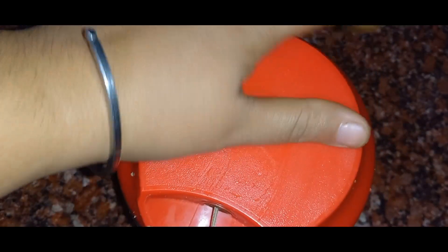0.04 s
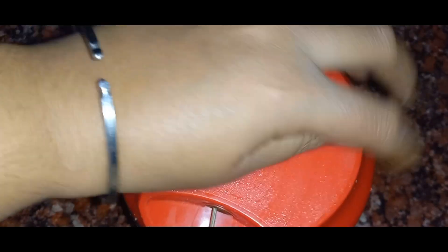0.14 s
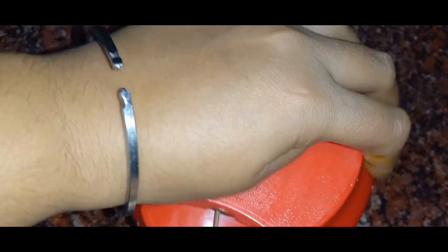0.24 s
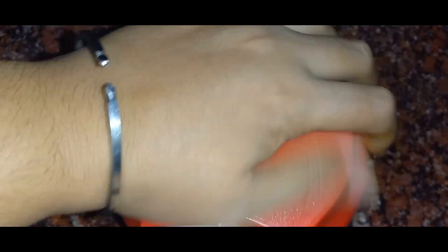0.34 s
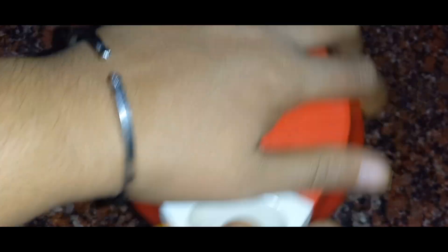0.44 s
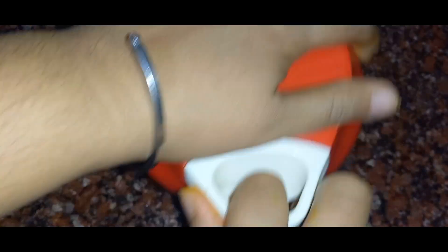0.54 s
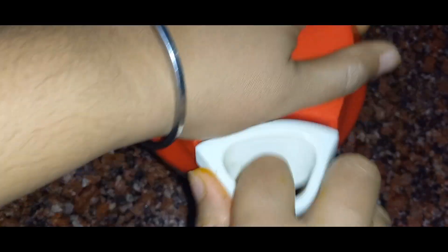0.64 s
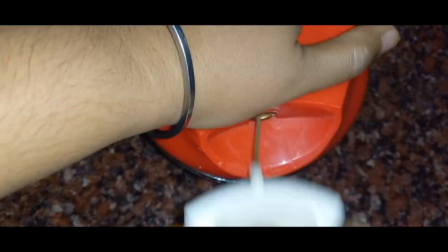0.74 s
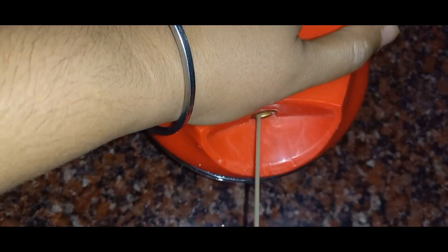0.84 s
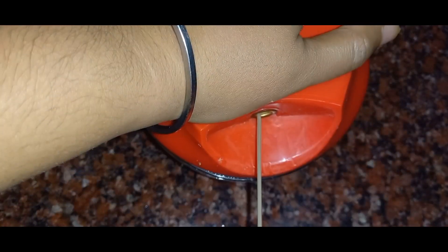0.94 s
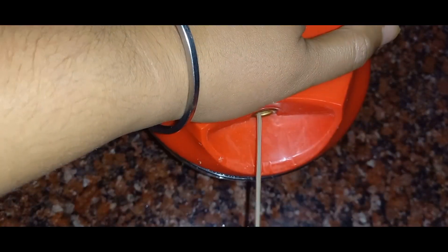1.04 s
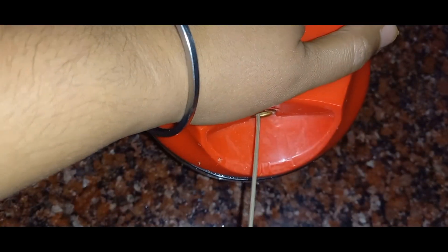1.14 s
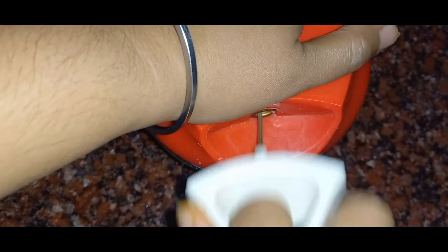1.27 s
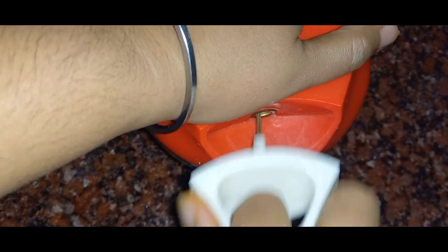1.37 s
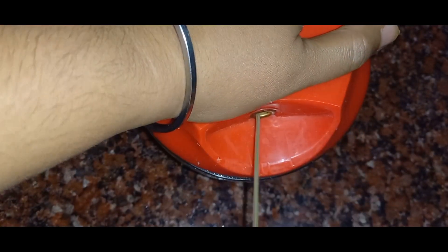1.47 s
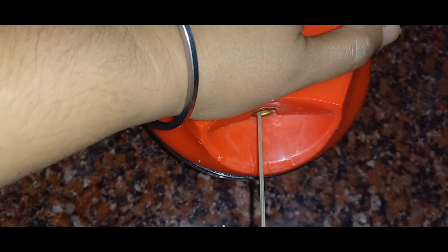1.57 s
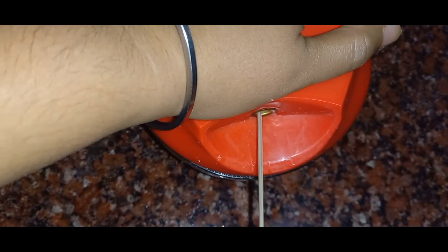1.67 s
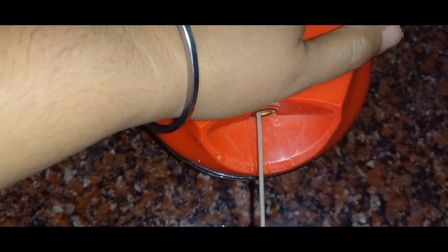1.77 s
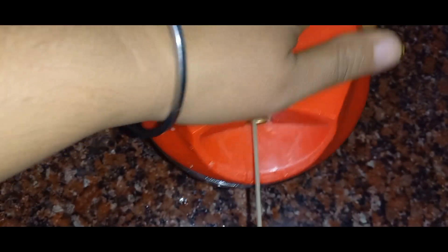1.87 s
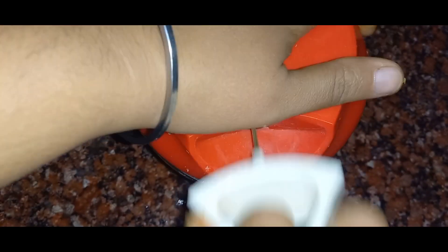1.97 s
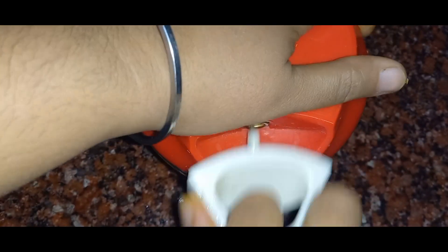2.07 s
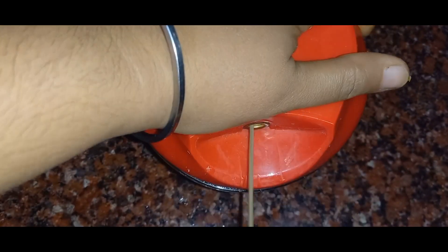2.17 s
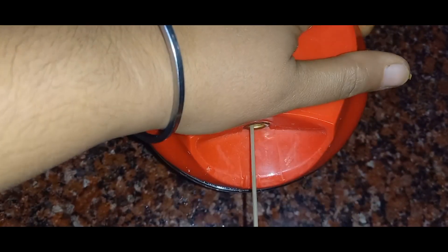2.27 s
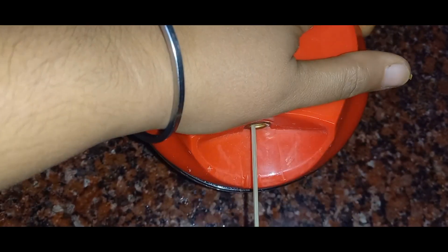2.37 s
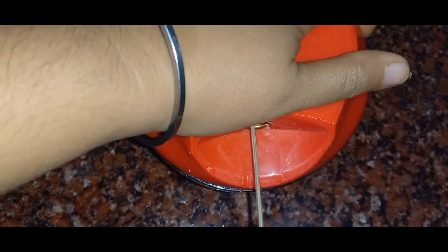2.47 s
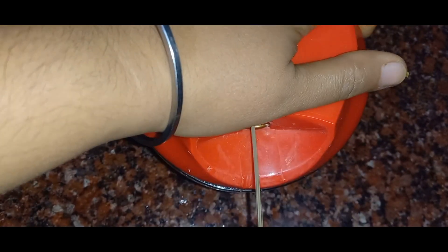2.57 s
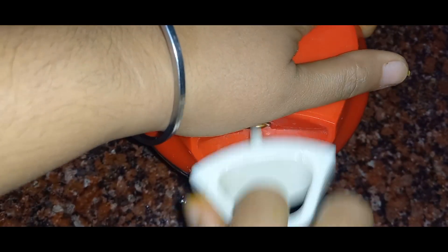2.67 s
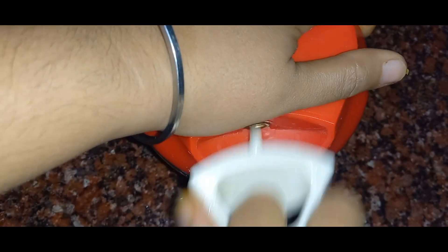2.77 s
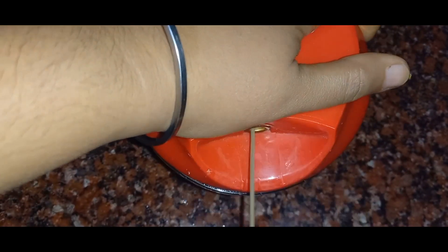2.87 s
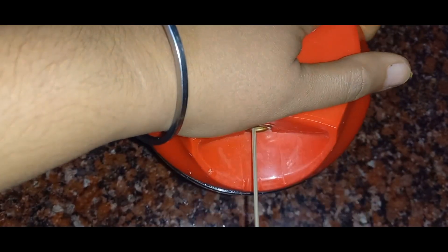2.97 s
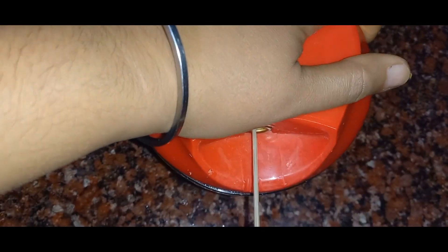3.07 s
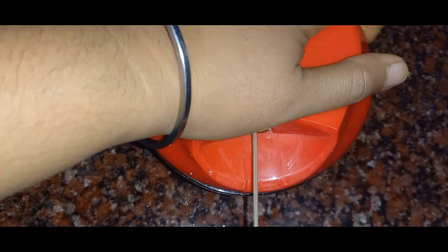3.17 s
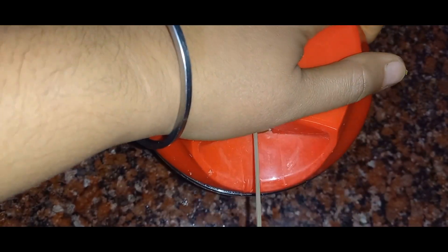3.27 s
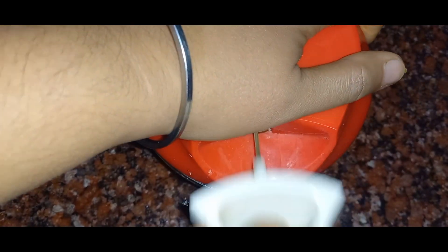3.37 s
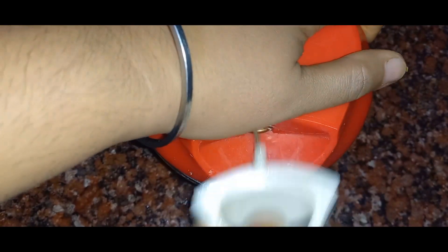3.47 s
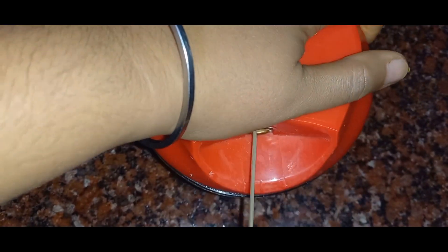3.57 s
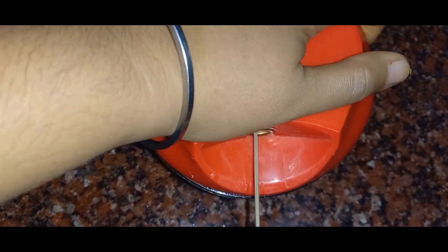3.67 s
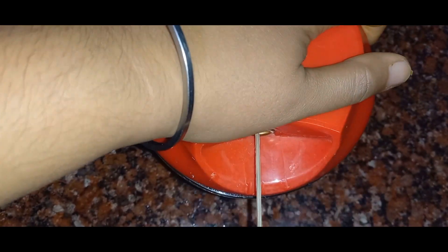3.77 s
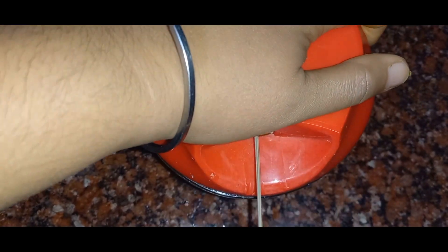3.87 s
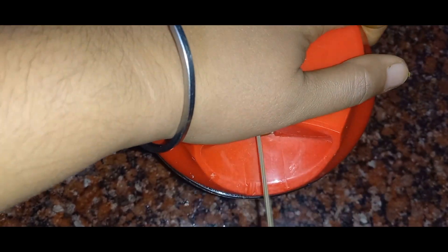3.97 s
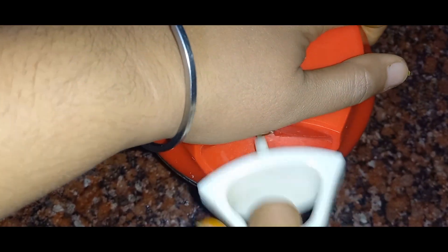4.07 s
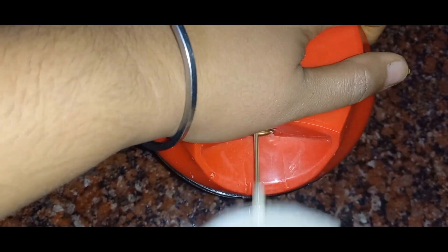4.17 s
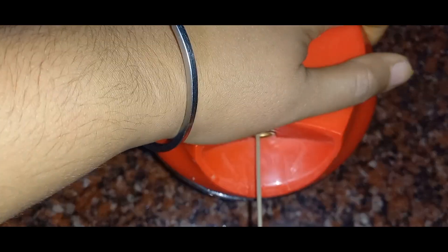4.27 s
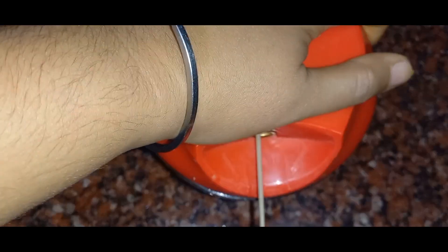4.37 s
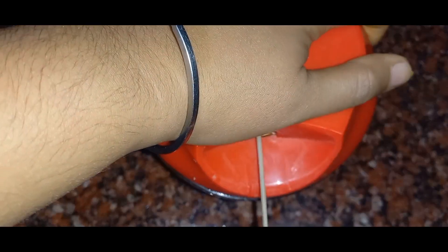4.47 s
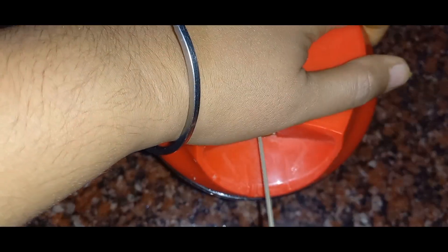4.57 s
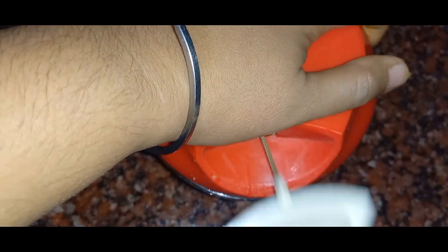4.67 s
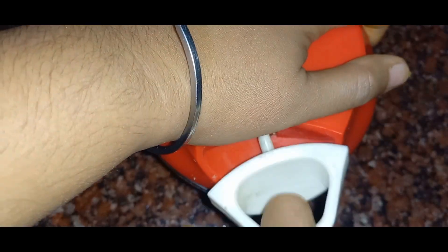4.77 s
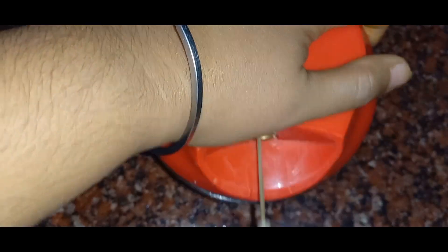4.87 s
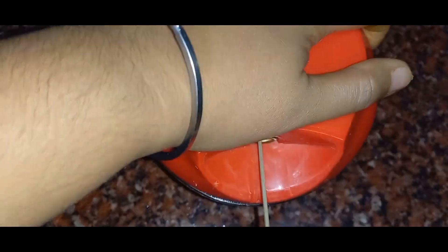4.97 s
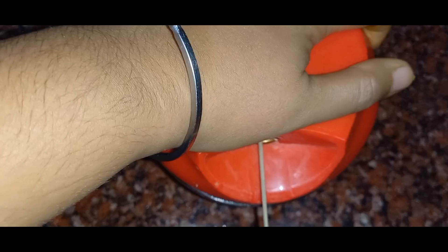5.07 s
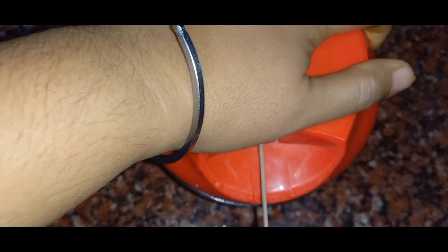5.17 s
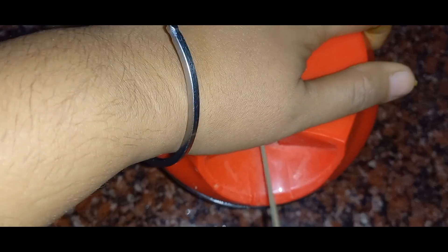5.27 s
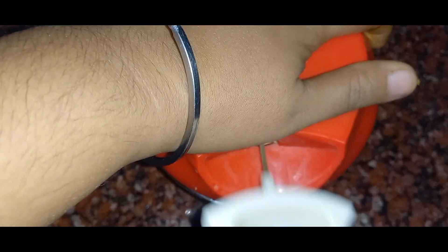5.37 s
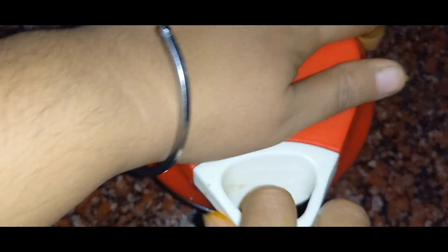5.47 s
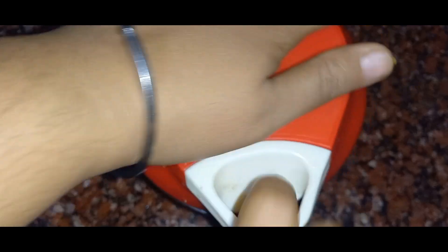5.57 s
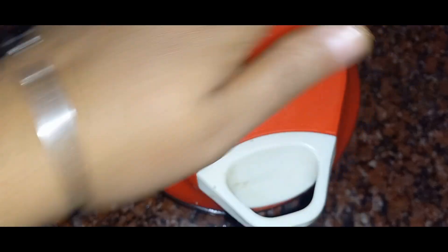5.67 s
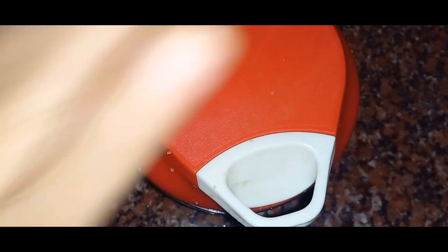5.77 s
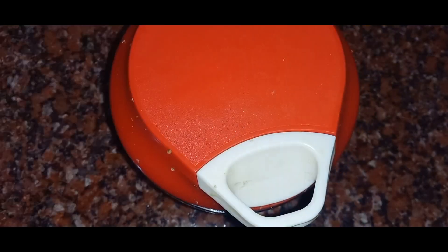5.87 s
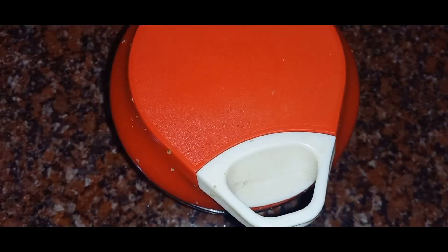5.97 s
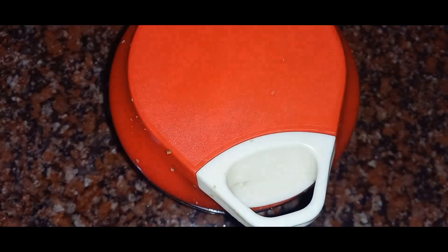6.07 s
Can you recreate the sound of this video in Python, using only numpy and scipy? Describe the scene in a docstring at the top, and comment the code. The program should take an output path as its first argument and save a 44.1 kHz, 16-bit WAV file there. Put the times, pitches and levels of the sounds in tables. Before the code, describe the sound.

Close plastic chopper on a stone counter: repeated gritty whirs, springy rasping cord returns, handle clacks, then a soft closing thud.

```python
"""A small hard kitchen: a hand-pulled food chopper works on a stone counter, close to a phone's two microphones.
Each pull spins blades that grind and knock the plastic bowl; a spring drags the cord back with a bright rasp.
Handle, hand and bowl clack and thump, brief rubs scrape the plastic, the bowl thuds on the stone near the end and
soft noise dies away after the last knocks; a low hum lies beneath. Friction and impact noise excite resonant modes
of lid, bowl, spring and slab; decaying noise makes the room."""
import sys
import numpy as np
from scipy import signal
from scipy.fft import rfft, irfft
from scipy.io import wavfile
from scipy.ndimage import uniform_filter1d

SR = 44100
rng = np.random.default_rng(int(sys.argv[2]) if len(sys.argv) > 2 else 0)


def to_wav(sig):
    """Store sig (one row per channel, or 1-D mono) as 16-bit WAV at the path in sys.argv[1].

    Samples outside -1..1 are clipped; the rate is SR.
    """
    pcm = np.clip(np.atleast_2d(sig), -1, 1) * 32767
    pcm = np.round(pcm).astype(np.int16)
    wavfile.write(sys.argv[1], SR, pcm.T)  # frames by channels


def attenuation_scalar(level_db):
    """Turn a level in dB into a linear amplitude multiplier (20 dB per decade)."""
    decades = np.asarray(level_db, float) / 20
    return 10 ** decades


N = 270814
T = np.arange(N) / SR

# All source and mode levels are relative: the mixing gains below scale them.
# each return of the cord: bite_s (spring bites), fastest_s, home_s, rasp_db, treble_db (above the rasp)
REWINDS = [(1.171, 1.233, 1.364, -32, 2), (1.861, 1.935, 2.153, -29, -1.5), (2.554, 2.609, 2.77, -30, 0.5),
           (3.239, 3.299, 3.467, -30.5, 1), (3.923, 3.992, 4.18, -28.5, -1.5),
           (4.58, 4.656, 4.81, -28.5, -0.9), (5.241, 5.32, 5.535, -34.5, -1.1)]
# modes of lid and handle: mode_hz, level_db, t60_s
LID_MODES = [(840, -14.5, 0.01), (1320, 0, 0.016), (1410, 3, .04), (1610, 3.5, 0.063), (1887, 6.5, 0.066),
             (2100, 5, 0.028), (2487, -1, 0.036), (2790, 0, 0.012), (3430, -0.5, 0.026), (4010, 4, 0.0061),
             (4860, 1.5, 0.0045)]


def unit(x):
    """Power normalization: scale to rms 1."""
    return x / np.sqrt(np.mean(x ** 2) + 1e-18)


def colour(x, points):
    """Minimum-phase filtering: the folded cepstrum of a (Hz, dB) gain curve gives a causal, unit-energy response."""
    hz, db = np.transpose(points)
    bin_hz = np.arange(1025) * SR / 2048
    log_gain = np.interp(np.log(bin_hz + 1), np.log(hz), db) * np.log(10) / 20
    cepstrum = irfft(log_gain)
    cepstrum[1:1024] *= 2
    cepstrum[1025:] = 0
    taps = irfft(np.exp(rfft(cepstrum)))
    return signal.oaconvolve(x, taps / np.sqrt(np.sum(taps ** 2)))[:N]


def walk(rate):
    """Slow random modulation: random levels, rate per second, joined by ramps and scaled to rms 1."""
    k = int(SR / rate)
    held = np.repeat(rng.standard_normal(N // k + 1), k)
    return unit(uniform_filter1d(held, k)[:N])


def ring(drive, modes, flicker_db, rate=70):
    """Modal superposition: separate noises, each flickering by itself, shake two-pole resonators at about unit power."""
    out = 0
    for hz, db, t60 in modes:
        r = np.exp(-np.log(1000) / (t60 * SR))
        shake = drive * rng.standard_normal(N) * attenuation_scalar(db + flicker_db * walk(rate))
        zeros = np.sqrt((1 - r * r) / 2) * np.array([1, 0, -1])
        poles = [1, -2 * r * np.cos(2 * np.pi * hz / SR), r * r]
        out = out + signal.lfilter(zeros, poles, shake)
    return out / np.sqrt(np.sum(attenuation_scalar(np.array(modes)[:, 1]) ** 2))


def grit(rate, spread_db, smooth, lumps_db, lump_rate, treble_rough):
    """Rough friction: random scraping impacts over a steady force, swelling in lumps; lid, bowl and treble."""
    hit = rng.random(N) < rate / SR
    size = np.minimum(rng.exponential(size=N), 3)
    # each impact decays with a time constant of 1.6 ms
    scrapes = signal.lfilter([1], [1, -np.exp(-1 / (0.0016 * SR))], hit * attenuation_scalar(spread_db * size))
    force = unit((unit(scrapes) + smooth) * attenuation_scalar(lumps_db * walk(lump_rate)))
    # an exponent below 1 evens out the force on the treble
    return np.array([force, force, unit(force ** treble_rough)])


def stroke(s, db, boom_db, treble_db):
    """Friction envelope: levels of lid, bowl and treble interpolated in dB, with a sharp onset and a gentle release."""
    attack_s, release_s = 0.002, 0.03  # before the first time, after the last
    fade = np.clip(np.minimum((T - s[0]) / attack_s, (s[-1] - T) / release_s) + 1, 0, 1)
    return fade * attenuation_scalar([np.interp(T, s, np.add(db, above)) for above in (0, boom_db, treble_db)])


def pulls():
    """Speed-dependent friction: blades speed up, grind and coast until the spring bites; slow blades sound boomier."""
    # each pull of the cord: grip_s, full_speed_s, let_go_s, full_speed_db, let_go_db
    pull_rows = [(0.791, 0.877, 1.072, -28, -29), (1.475, 1.568, 1.74, -28, -26.5),
                 (2.223, 2.293, 2.485, -24, -32), (2.914, 3.023, 3.132, -23, -28),
                 (3.578, 3.681, 3.803, -25, -24.5), (4.229, 4.372, 4.483, -25, -27.5),
                 (4.902, 5.006, 5.12, -30.5, -27)]
    grip_loss_db, coast_db_per_s = 14.5, 237
    # level above the grinding, and dB regained for each dB that slow blades lose
    boom_db, slow_boom = 0.55, 0.3
    treble_db, slow_treble = -12, 0.044
    out = 0
    for (grip, full, go, db, go_db), (bite, *_) in zip(pull_rows, REWINDS):
        stop = bite - 0.012
        lost_db = np.array([grip_loss_db, 0, 0, coast_db_per_s * (stop - go)])
        grind_db = [db, db, go_db, go_db] - lost_db
        out = out + stroke([grip, full, go, stop], grind_db,
                           boom_db + slow_boom * lost_db, treble_db + slow_treble * lost_db)
    return out


def rewinds():
    """Spring-driven friction: the spring bites, whips the cord in and slackens steadily until the handle is home."""
    bite_db, slack_db_per_s = -11, 90.5  # both relative to the fastest moment
    whip_s = 0.07  # the treble's third point lies this long after the fastest moment
    # above the rasp at bite, fastest, end of the whip and home
    boom_db, treble_shape_db = (3.5, 0, -2.5, -5), (3, -0.5, 2.5, -5.5)
    out = 0
    for bite, fastest, home, db, treble_db in REWINDS:
        slack_db = [bite_db, 0, -slack_db_per_s * whip_s, -slack_db_per_s * (home - fastest)]
        out = out + stroke([bite, fastest, fastest + whip_s, home], np.add(db, slack_db),
                           boom_db, np.add(treble_db, treble_shape_db))
    return out


def knocks():
    """Impact excitation: each knock drives the body with a decaying force and rings a note of wobbling level."""
    # clacks and thumps of handle, hand and bowl: start_s, level_db, boom_db, treble_db (above the level), note_hz
    clacks = [(0.351, -24, 2, -17, 1790), (0.372, -14, -20, -11.5, 1740), (0.392, -17.5, -9.5, -10.5, 1910),
              (0.407, -18.5, -9, -5, 2120), (0.456, -22, -13, -35, 1590), (0.471, -22, -17, -36, 1560),
              (0.762, -21, -16, -6, 1740), (0.778, -16, -5, -13.5, 1300), (1.434, -49.5, 17, -12, 1030),
              (1.474, -40, 2, 5, 1830), (1.486, -39, 16, -16, 1298), (1.51, -18, -18, -9, 1880),
              (2.124, -23.5, 5.5, -25, 1300), (2.159, -20, -16, -30, 2050), (2.181, -22, -1.5, -8.5, 1860),
              (2.782, -14, -8, -19, 1080), (2.798, -6.5, -15.5, -17, 2780), (2.875, -14.5, -13, -20, 1640),
              (2.887, -16.5, -10.5, -18.5, 1900), (3.517, -23, -5, -15.5, 1668),
              (3.536, -16, -13, -25, 2090), (3.565, -27, -6.5, -2.5, 1730), (4.195, -19.5, -11, -27, 1073),
              (4.209, -11.5, -19, -26, 2120), (4.238, -19, -3.5, -9, 1670), (4.258, -24, -1, -5, 1900),
              (4.826, -9.5, -16.5, -25, 2100), (4.837, -4.5, -17.5, -18.5, 2740),
              (4.901, -27, -10, -2, 1630), (4.917, -17.5, -2, -15, 1580), (5.536, -21.5, -7, -3.5, 2800),
              (5.545, -11.5, -14, -17.5, 1190), (5.571, -12.5, -23.5, -18.5, 1770),
              (5.735, -35.5, 9, -28, 1910), (6.06, -72.5, 17.5, -20, 999.8)]
    # blades fling hard lumps at the wall: start_s, level_db, treble_db (above the level), note_hz
    lumps = [(0.876, -15, -13, 1610), (1.027, -11, -28, 1614), (1.058, -20.5, -29.5, 1690),
             (1.097, -14.5, -24, 1957), (1.539, -19.5, -20, 2870), (1.707, -24, -26, 1800),
             (2.273, -12.5, -32, 1610), (2.436, -17.5, 0.5, 1640), (2.463, -19.5, -24, 2170),
             (3.063, -13, -25, 1940), (3.105, -16.5, -7, 1570), (3.154, -11.5, -32.5, 3430),
             (3.731, -12.5, -36, 1840), (3.853, -14.5, -17, 3630), (4.363, -13.5, -14, 4130),
             (4.424, -17.5, -20, 1700), (4.468, -14, -12.5, 1390), (5.061, -13.5, -8.5, 2430),
             (5.098, -18.5, -22.5, 1610), (5.146, -17, -23, 1570)]
    # returning cord snags on the spool: start_s, level_db, note_hz
    snags = [(1.191, -21, 1380), (1.241, -28, 1762), (1.918, -12, 1960), (2.588, -12, 1410),
             (2.628, -21.5, 1875), (3.3, -14, 1730), (3.342, -16.5, 2800), (4.641, -11, 1410),
             (5.245, -17, 1410)]
    # ratchet click as the spring bites: level_db, boom_db, treble_db (both above the level), note_hz
    catch = (-31.5, -13.5, -11, 1945)
    lump_boom_db, snag_boom_db, snag_treble_db = -12.5, -16, -13.5  # above the level
    rows = list(clacks)
    rows += [(s, db, lump_boom_db, treble_db, hz) for s, db, treble_db, hz in lumps]
    rows += [(s, db, snag_boom_db, snag_treble_db, hz) for s, db, hz in snags]
    rows += [(bite, *catch) for bite, *_ in REWINDS]
    drives, notes = np.zeros((3, N)), np.zeros(N)
    t = T[:SR // 20]
    for s, db, boom_db, treble_db, hz in rows:
        i = int(s * SR)
        # slower rings take more force for the same peak
        force = attenuation_scalar([[db - 8.5], [db + boom_db + 3.0], [db + treble_db - 4.0]])
        drives[:, i:i + len(t)] += force * np.exp(-t / 0.0031)
        # the note falls 78 dB in the decay time of the lid's modes near it
        fade = np.exp(-9.0 * t / np.interp(hz, *np.transpose(LID_MODES)[::2]))
        wobble = 1 + 0.46 * np.sin(0.49 * hz * t)
        notes[i:i + len(t)] += attenuation_scalar(db - 8.0) * np.sin(2 * np.pi * hz * t) * fade * wobble
    return drives, notes


def rubs():
    """Noise swells: brief rubs scrape the plastic, and after the last knocks a soft noise dies away."""
    # each swell of noise: start_s, loudest_s, end_s, rub_db, boom_db (bowl above the rub)
    rub_rows = [(-0.15, 0.098, 0.16, -59.5, 8), (0.12, 0.3, 0.49, -52, -10), (0.35, 0.436, 0.53, -44.5, 5),
                (0.706, 0.761, 0.84, -50.5, -1), (2.785, 2.82, 3.0, -35, 0.5),
                (5.58, 5.588, 5.71, -43, -2.5), (5.734, 5.76, 5.95, -60.5, 5.5)]
    light_db, treble_db = -20, -10  # start and end under the loudest; treble above the rub
    out = 0
    for *s, db, boom_db in rub_rows:
        out = out + stroke(s, [db + light_db, db, db + light_db], boom_db, treble_db)
    return out


def chopper(pull, rewind, rub, knock):
    """Shared resonators: all these sources sound through the same lid, bowl and spring, over broad coloured noise."""
    # air and walls of the bowl: mode_hz, level_db, t60_s
    bowl_modes = [(202.8, -5, 0.12), (228.7, -5.5, 0.087), (282, -7, .06), (327.3, 0.5, 0.041),
                  (344.3, 1, 0.089), (430, -13.5, 0.0068), (451, -7, 0.043), (582, -9.5, 0.022),
                  (642, -4.5, 0.057), (797.5, -12, 0.12)]
    # coil spring and spool: mode_hz, level_db, t60_s
    spring_modes = [(8470, 1.5, 0.019), (9000, -10.5, .008), (11120, 0.5, 0.011), (12000, 0, .012)]
    # broad colour of grinding and knocks: hz, density_db (per Hz, relative)
    grind_colour = [(410, -26.5), (700, -3), (900, 4.5), (970, 0.5), (1640, 3), (2730, -4), (3450, 2.5),
                    (6500, -24.5), (8450, -41), (14300, -120)]
    # broad colour of rasp and rubs: hz, density_db (per Hz, relative)
    rasp_colour = [(410, -26), (700, -2), (1170, -10), (1280, -6.5), (1520, -4.5), (1880, 6.5),
                   (2350, -5.5), (3420, -1.5), (6500, -16), (8450, -45), (14300, -120)]
    # broad colour of every source's treble: hz, density_db (per Hz, relative)
    treble_colour = [(3240, -16), (5500, -1), (6890, -3), (8430, 2), (11200, 0), (14800, -1.5),
                     (16000, -11), (16500, -72.5)]
    lid_drive = 0.42 * pull[0] + 0.31 * rewind[0] + 0.5 * rub[0] + 0.5 * knock[0]
    lid = ring(lid_drive, LID_MODES, 4.7)
    bowl = ring(pull[1] + rewind[1] + rub[1] + knock[1], bowl_modes, 2.26, rate=30)
    spring_drive = 0.26 * pull[2] + 0.61 * rewind[2] + 0.2 * rub[2] + 0.31 * knock[2]
    spring = ring(spring_drive, spring_modes, 2.1, rate=31)
    grind, rasp, hiss = rng.standard_normal((3, N))
    broad = colour(grind * (0.69 * pull[0] + 0.77 * knock[0]), grind_colour)
    broad += colour(rasp * (0.98 * rewind[0] + 0.81 * rub[0]), rasp_colour)
    broad += colour(hiss * (pull[2] + rewind[2] + rub[2] + knock[2]), treble_colour)
    # the small bowl sends out little below its first mode
    radiation = signal.butter(3, 160.0, "high", fs=SR, output="sos")
    return signal.sosfilt(radiation, lid + bowl + spring + broad)


def rattle(level, low_hz, high_hz, cycles, spread_db, count):
    """Random impacts: bits of food and gear teeth tick the walls, each a brief damped sine; mid and side."""
    when, pitch, size, pan = rng.random((count, 4)).T
    length = 600  # samples
    start = (when * (N - length)).astype(int)
    turns = (low_hz * (high_hz / low_hz) ** pitch)[:, None] * T[:length]
    strength = attenuation_scalar(-spread_db * np.log(size + 0.016))[:, None]
    ticks = np.sin(2 * np.pi * turns) * np.exp(-turns / cycles) * strength
    ticks /= np.sqrt(np.sum(ticks ** 2) / N)
    places = (start[:, None] + np.arange(length)).ravel()
    return [np.bincount(places, (ticks * (level[start] * weight)[:, None]).ravel(), N)
            for weight in (1, 3.3 * (pan - 0.5))]


def thud():
    """Impulse response: one soft push rings the bowl's base on the stone as damped sines."""
    # bowl meets stone: start_s, level_db, push_s (time constant of the onset)
    thud_push = (5.738, -22.5, 0.0021)
    # base of the bowl on the stone: mode_hz, level_db, t60_s
    thud_modes = [(196.6, 3, 0.22), (321, -4.5, 0.12), (455, -9, 0.044), (650.6, -4, 0.033), (107, -15, .3)]
    s, db, push_s = thud_push
    t = np.maximum(T - s, 0)[:, None]
    hz, mode_db, t60 = np.transpose(thud_modes)
    rings = attenuation_scalar(mode_db) * np.sin(2 * np.pi * hz * t) * np.exp(-np.log(1000) * t / t60)
    rings *= 1 - np.exp(-t / push_s)
    return attenuation_scalar(db) * rings.sum(axis=1)


def counter(pull, rewind):
    """Forced vibration: the strokes and the hand's jolts keep the slab's low resonances going."""
    # lowest resonance, then the upper pair: mode_hz, level_db, t60_s
    slab_modes = [(69.9, 0.004, .5)], [(97.3, -0.4, 0.35), (127.8, -1.1, 0.23)]
    # the hand leans on or leaves the chopper: peak_s, lowest_db, upper_pair_db
    jolts = [(0.409, -53, -49), (1.42, -70, -49.5), (3.83, -50, -64), (5.61, -48.5, -56),
             (5.78, -41.5, -45.5), (6.08, -68, -58)]
    # lowest resonance and upper pair: at rest, then relative to the bowl boom of each stroke
    rest_db, pull_shake_db, rewind_shake_db = (-72.5, -61.5), (-23.5, -20.5), (-23, -20)
    lag_s, jolt_rise_s, jolt_db_per_s = 0.056, 0.054, 133
    lag = np.exp(-1 / (lag_s * SR))
    out = 0
    for k, modes in enumerate(slab_modes):
        push = attenuation_scalar(pull_shake_db[k]) * pull[1] + attenuation_scalar(rewind_shake_db[k]) * rewind[1]
        shove = signal.lfilter([1 - lag], [1, -lag], push)
        for s, *db in jolts:
            rise = np.clip(1 + (T - s) / jolt_rise_s, 0, 1)
            shove = shove + rise * attenuation_scalar(db[k] - jolt_db_per_s * np.maximum(T - s, 0))
        out = out + unit(ring(1, modes, 0)) * (attenuation_scalar(rest_db[k]) + shove)
    return out


def opposed(x):
    """Mid-side stereo: a coloured signal enters the two channels with opposite signs."""
    # width of the sound: hz, side_minus_mid_db
    width = [(60, -25.5), (110, -12.5), (200, -17.5), (380, -11.5), (700, -10), (1290, -3.5), (2380, -3.5),
             (4400, -1), (8120, 0), (15000, -0.5)]
    # restore the mean gain that colour() normalizes away
    gain = attenuation_scalar(np.interp(np.arange(SR // 2), *np.transpose(width)))
    wide_db = 10 * np.log10(np.mean(gain ** 2))
    return np.array([[1], [-1]]) * attenuation_scalar(wide_db) * colour(x, width)


def room(near):
    """Diffuse reverberation: convolution with exponentially decaying noise, one tail for each microphone."""
    t60_s, treble_t60_s, level_db = 0.38, 0.37, -9
    t = T[:SR // 2]
    noise = rng.standard_normal((2, len(t))) * (t > 0.004)
    low = signal.sosfilt(signal.butter(2, 2500.0, fs=SR, output="sos"), noise)
    # the treble dies away slightly sooner
    tails = low * np.exp(-np.log(1000) * t / t60_s)
    tails += (noise - low) * np.exp(-np.log(1000) * t / treble_t60_s)
    # both microphones share the room's bass
    tails += signal.sosfilt(signal.butter(2, 600.0, fs=SR, output="sos"), tails.mean(axis=0) - tails)
    heard = [signal.oaconvolve(near, tail / np.sqrt(np.sum(tail ** 2)))[:N] for tail in tails]
    return attenuation_scalar(level_db) * np.array(heard)


def hum():
    """Stationary filtered noise: a low hum in mid and side that sinks away at the end."""
    # spectrum of the hum: hz, density_db (per Hz, relative)
    hum_colour = [(24, -26), (40, -6.5), (137, -2), (220, -11), (770, -31), (1150, -39), (1900, -32.5),
                  (3470, -36.5), (6650, -38), (16000, -35.5)]
    level_db, fade_from_s, fade_db_per_s = -59, 5.9, 50
    mid, side = (colour(rng.standard_normal(N), hum_colour) for _ in range(2))
    level = attenuation_scalar(level_db - fade_db_per_s * np.maximum(T - fade_from_s, 0))
    return level * (mid + opposed(side))


def scene():
    """Superposition: direct mid and side sound of chopper and counter, room reverberation and hum."""
    blows, notes = knocks()
    pull, rewind = pulls(), rewinds()
    forces = (pull * grit(350, 6.3, 3.04, 2.6, 90, 0.57),
              rewind * grit(570, 3.0, 1.8, 1.92, 70, 0.79),
              rubs() * grit(450, 5.1, 1.0, 5.8, 40, 0.76),
              blows)
    ticks, ticks_side = rattle(0.51 * pull[0] + 0.2 * rewind[0], 985.0, 4720.0, 3.8, 3.9, count=1800)
    near = chopper(*forces) + ticks + thud() + counter(pull, rewind)
    # so close, each microphone hears its own parts of the wide lid, most of all in the treble
    notes_side = 0.45 * np.roll(notes, 9)
    side = opposed(chopper(*forces) + ticks_side + notes_side + counter(pull, rewind))
    return near + notes + side + room(near) + hum()


def roll_off(x):
    """The treble ends steeply here."""
    return signal.sosfilt(signal.butter(12, 16640, fs=SR, output="sos"), x)


def record(dry):
    """High-pass filtering: the phone cuts the deepest bass steeply."""
    cut = signal.sosfilt(signal.butter(6, 60.0, "high", fs=SR, output="sos"), dry)
    return roll_off(cut)


dry = scene()
out = record(dry)
to_wav(out)
```